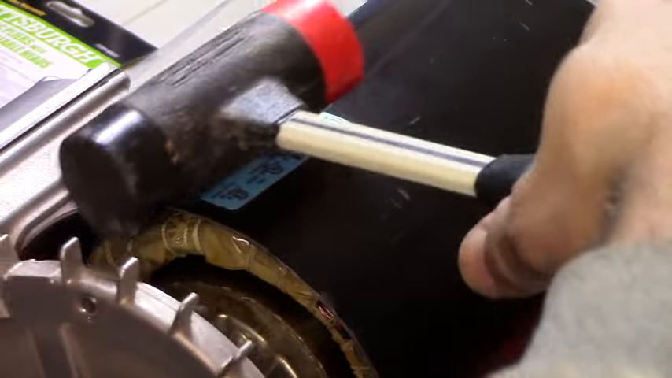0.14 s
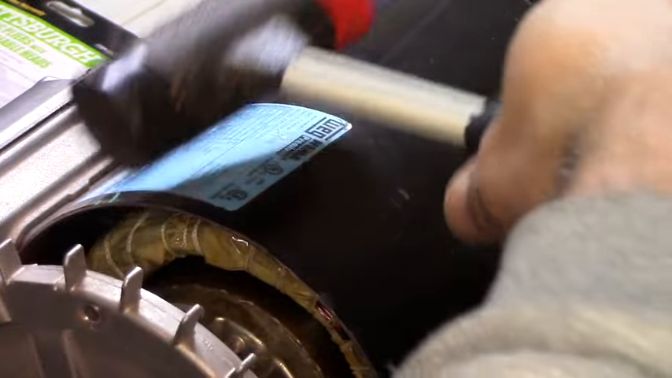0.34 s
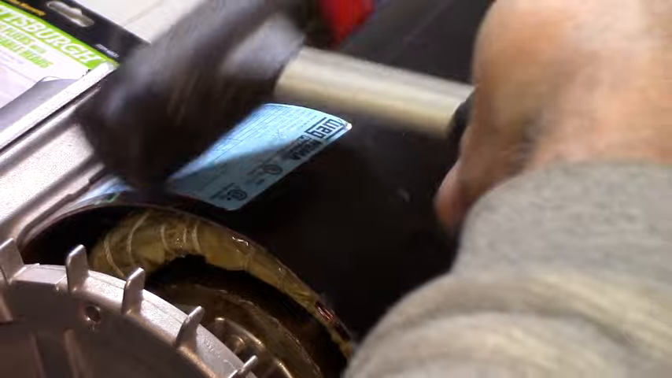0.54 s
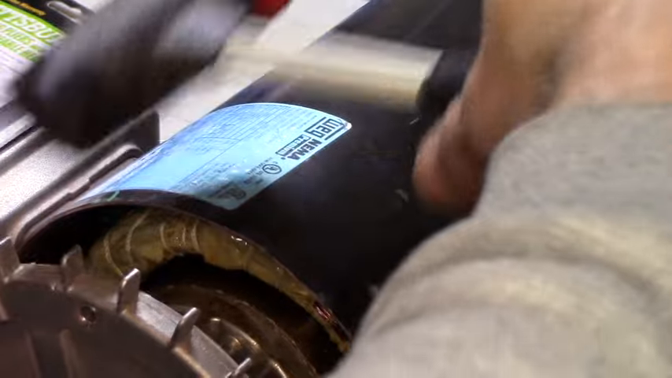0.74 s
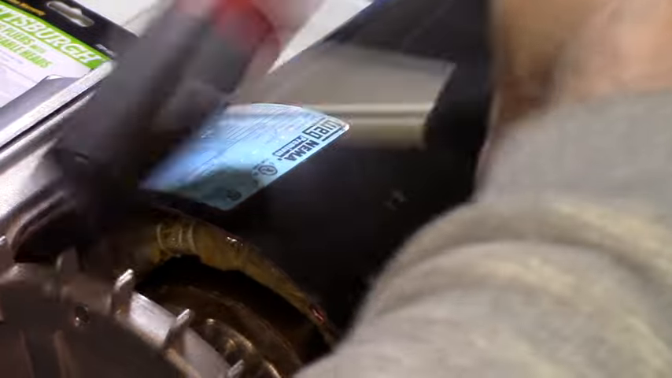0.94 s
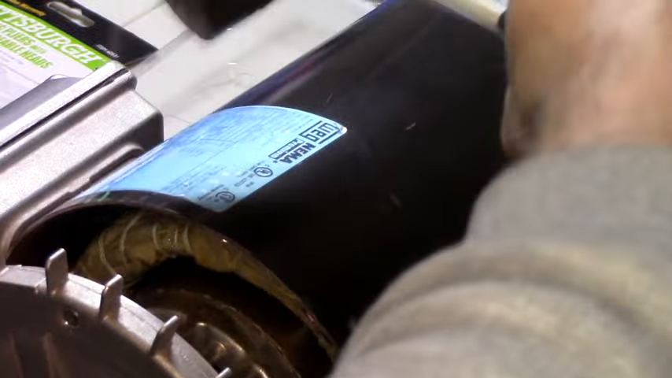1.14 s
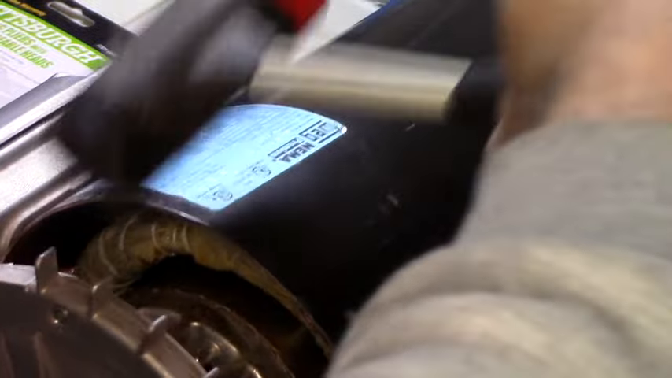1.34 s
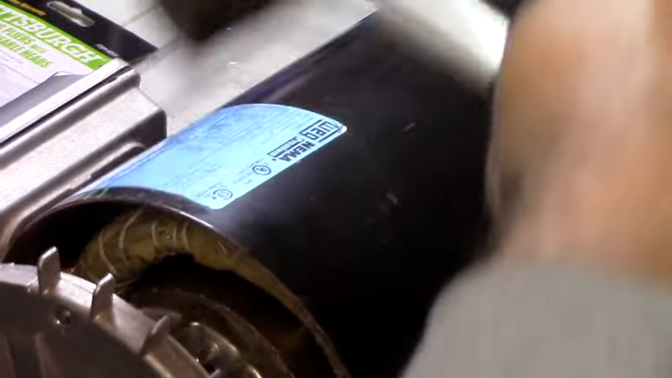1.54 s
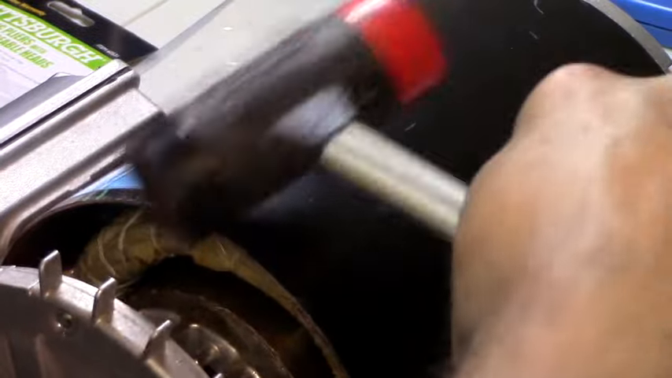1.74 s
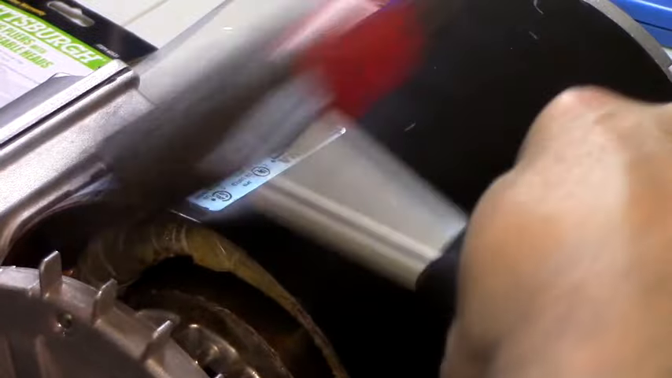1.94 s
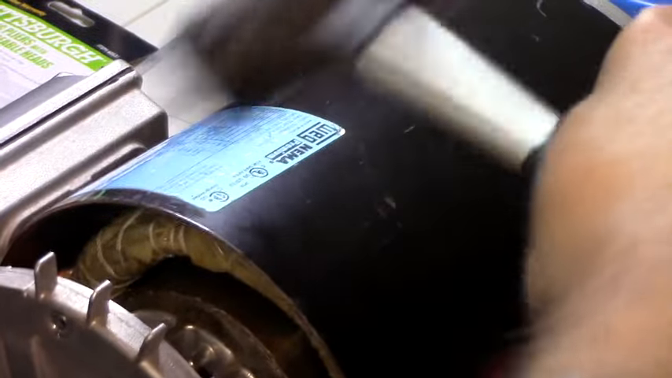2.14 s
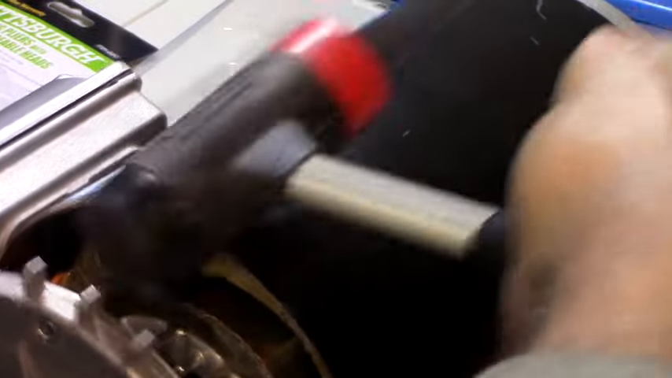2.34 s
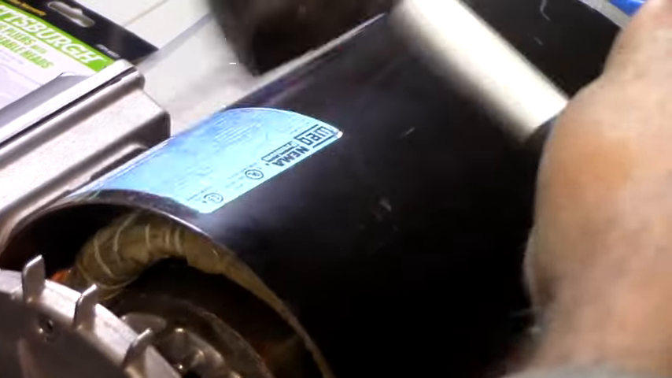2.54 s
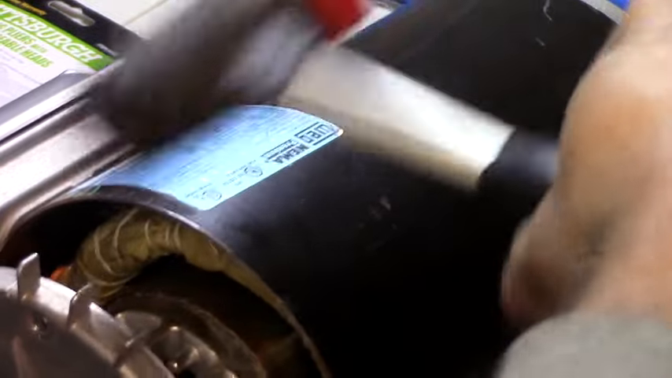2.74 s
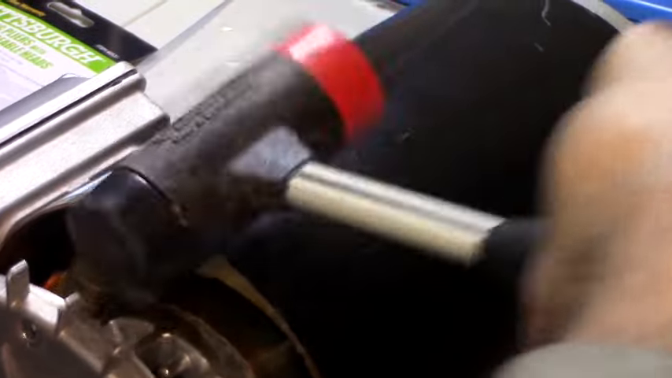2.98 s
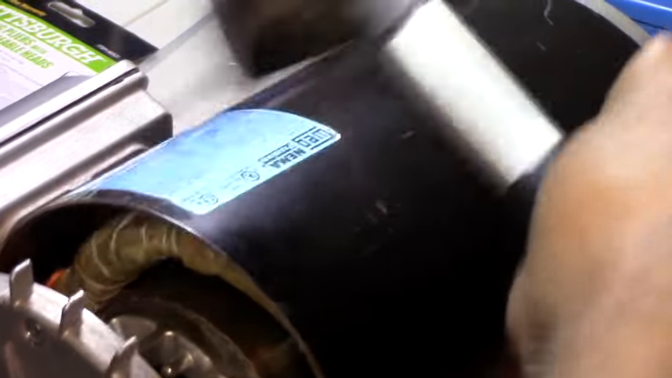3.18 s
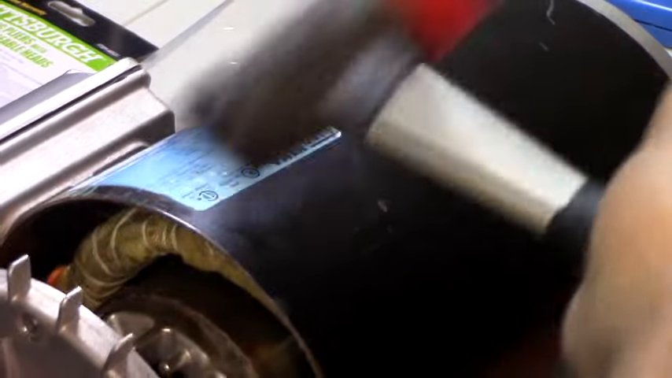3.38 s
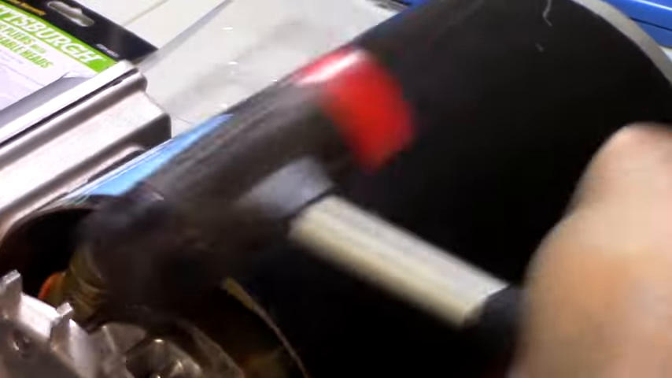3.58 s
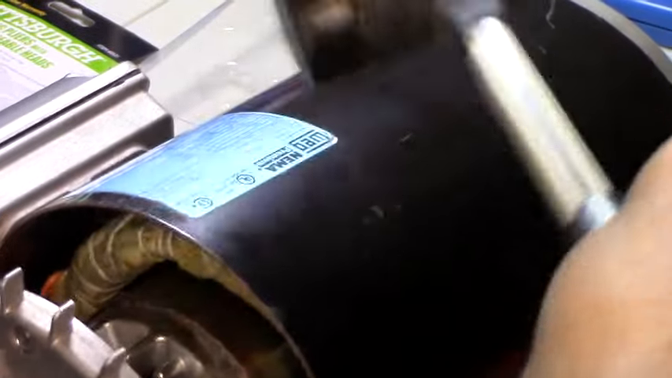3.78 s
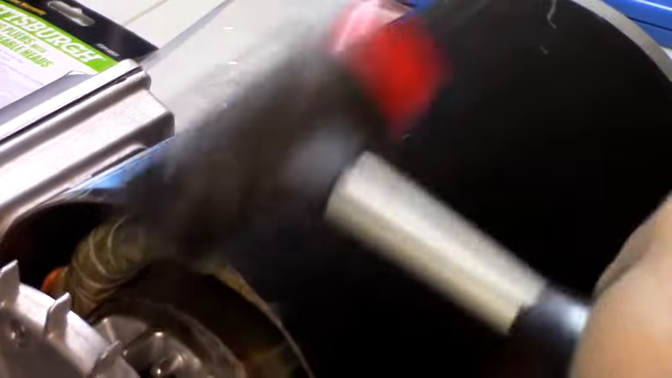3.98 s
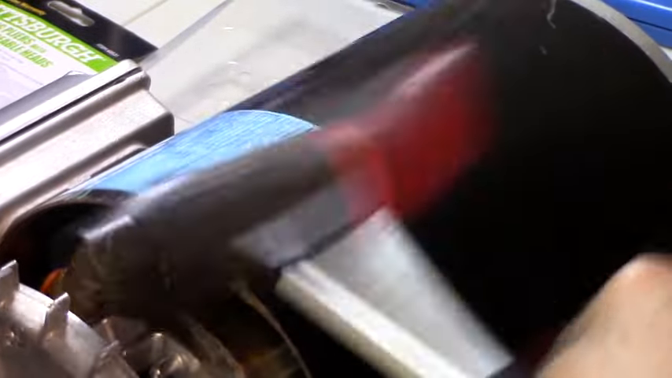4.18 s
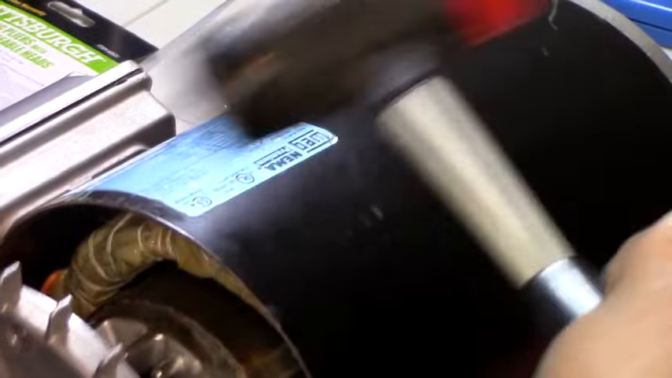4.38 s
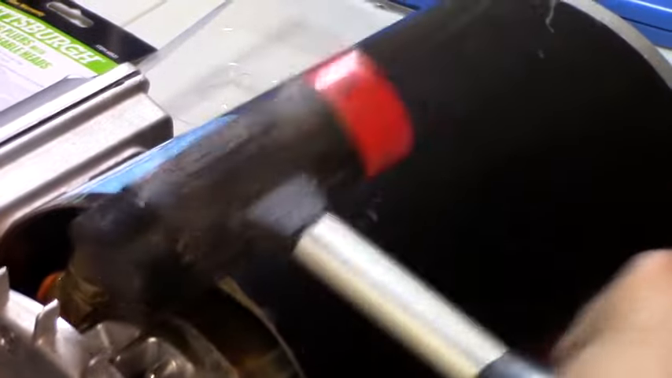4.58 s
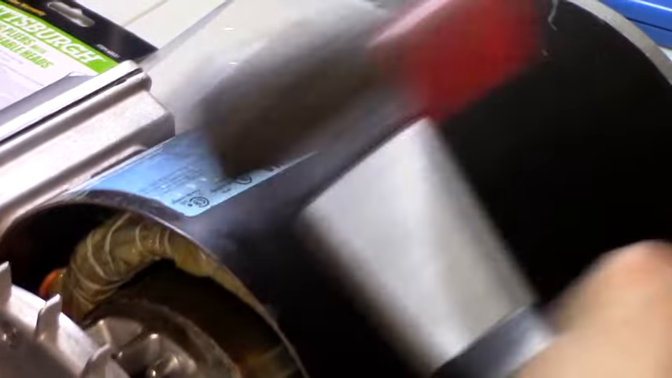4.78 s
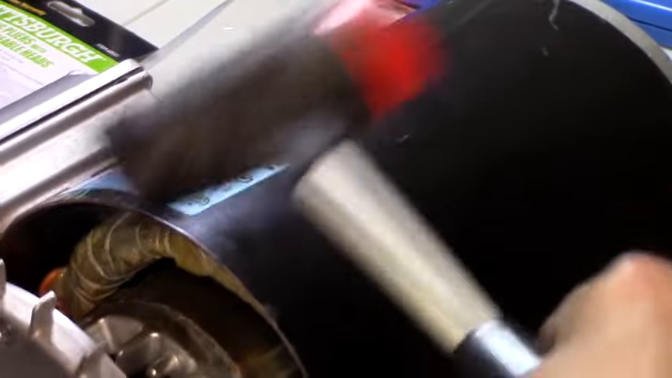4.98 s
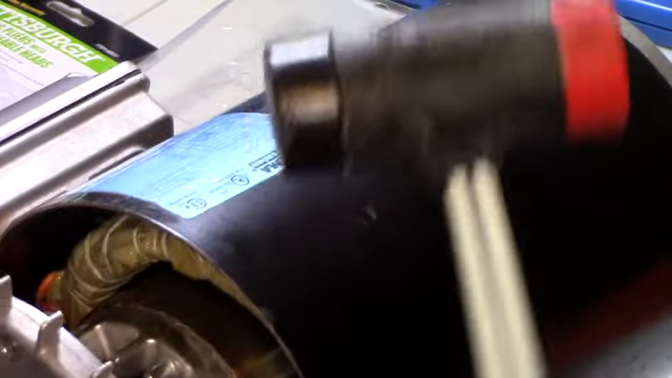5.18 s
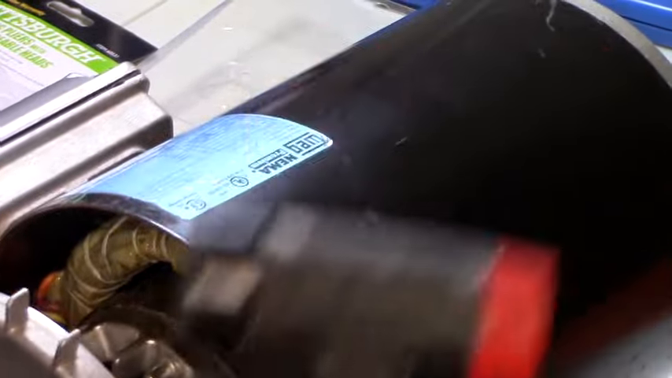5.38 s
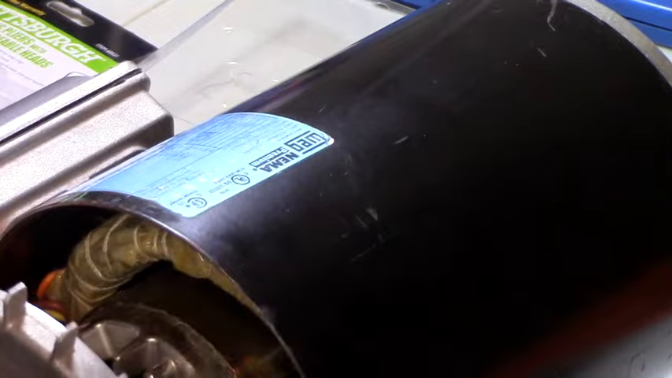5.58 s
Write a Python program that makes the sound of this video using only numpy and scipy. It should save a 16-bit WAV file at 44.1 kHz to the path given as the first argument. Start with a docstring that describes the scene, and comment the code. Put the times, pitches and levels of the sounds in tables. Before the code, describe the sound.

A soft-faced mallet knocks steadily on a hollow steel motor shell, dull clangs with a bright zing, the loose motor clacking on the bench.

```python
"""A soft-faced mallet knocks on the steel shell of an electric motor in a small workshop, about three times a second.
Each blow excites a dense field of decaying modes, a dull clang with a bright zing, and the bench answers with a thud.
After the earlier blows above all, the loose motor rocks on the bench: repeated landings, each a clack and a low boom.
Before the blows come drags (rough resonant noise), touches (short bands of noise) and a clunk (a few damped sines);
a few more touches and a drag fall between the blows. Beneath lie a rustle, a faint late echo and a steady hiss."""
import sys
import numpy as np
from scipy import signal
from scipy.fft import rfft, irfft, next_fast_len
from scipy.io import wavfile
from scipy.ndimage import uniform_filter1d

SR = 44100
rng = np.random.default_rng(int(sys.argv[2]) if len(sys.argv) > 2 else 0)


def wav_record(signal):
    """Record a signal, one row per channel, as 16-bit PCM in the file named by sys.argv[1]."""
    frames = np.transpose(np.atleast_2d(signal))
    bounded = np.clip(frames, -1, 1)
    # unit amplitude maps onto the largest positive 16-bit level
    quanta = np.round(bounded * 32767).astype(np.int16)
    wavfile.write(sys.argv[1], SR, quanta)


N = 247828
AGE = np.arange(int(.8 * SR)) / SR  # time since the start of one sound (s)


def undb(db):
    """Logarithmic level: decibels to amplitude gain."""
    return 10 ** (np.asarray(db) / 20)


def along(points, hz):
    """Log-frequency interpolation between (frequency [Hz], value) points."""
    at, value = np.transpose(points)
    return np.interp(np.log(hz + 1), np.log(at), value)


def colour(x, db_at):
    """Minimum-phase filtering by a gain in dB over frequency: causal, so attacks stay sharp."""
    size = 2 * next_fast_len(len(x))
    hz = np.arange(size // 2 + 1) * SR / size
    cepstrum = irfft(np.log(undb(db_at(hz))))
    # folding the cepstrum onto positive time gives the minimum phase
    cepstrum[1:size // 2] *= 2
    cepstrum[size // 2 + 1:] = 0
    response = np.exp(rfft(cepstrum))
    return irfft(rfft(x, size) * response)[:len(x)]


def noise(db_at, size=len(AGE)):
    """Spectral shaping of random noise, scaled to unit rms."""
    x = colour(rng.standard_normal(size), db_at)
    return x / x.std()


def fade(t60):
    """Exponential decay: a free vibration loses 60 dB in t60 seconds."""
    return undb(-60 * AGE / t60)


def hump(hz, centre_hz, width_hz):
    """Resonance curve: a bell of height 1 around the centre frequency."""
    return 1 / (1 + (2 * (hz - centre_hz) / width_hz) ** 2)


def resonance(centre_hz, width_hz):
    """Resonant band of noise: unit rms, steep sides and no deep bass."""
    def db_at(hz):
        bass_cut = (hz + 1) / np.hypot(hz, centre_hz / 3)
        return 40 * np.log10(hump(hz, centre_hz, width_hz)) + 20 * np.log10(bass_cut)
    return noise(db_at)


def ring(modes):
    """Modal superposition: modes (frequency [Hz], level [dB], t60 [s]), each a decaying sine."""
    return sum(undb(db) * fade(t60) * np.sin(2 * np.pi * hz * AGE) for hz, db, t60 in modes)


def waver(size, per_s):
    """Random modulation: a curve of spread near 1 through per_s new values a second."""
    return np.interp(np.arange(size) / SR * per_s, np.arange(512), rng.standard_normal(512))


def patches(depth_db, step_hz):
    """Dependence on the point of excitation: each spot favours its own modes, a random dB ripple."""
    knots = np.arange(0, SR / 2, step_hz)
    ripple = depth_db * rng.standard_normal(512)[:len(knots)].clip(-1.5, 1.5)
    return lambda hz: np.interp(hz, knots, ripple)


def add(out, s, x):
    """Linear superposition: mix x into out from time s on."""
    start = int(s * SR)
    out[start:start + len(x)] += x[:len(out) - start]


# Spectrum of the stir of hand and sleeve: (frequency [Hz], level [dB])
RUSTLE_SPECTRUM = [(25, -30.5), (70, -19.5), (140, -3.5), (400, -9), (900, -18.5), (1800, -16.5),
                   (5200, -22.5), (8000, -24), (15000, -43.5)]
# its level (dB), when the arm comes to rest (s), how fast it then dies (dB per s)
STIR_DB, REST_S, SETTLE_DB_PER_S = -68.5, 4.94, 36.5


def stir(waver_db=4.0, wavers_per_s=26):
    """Friction noise: the working arm rustles unevenly and settles when the mallet is put down."""
    settle_db = SETTLE_DB_PER_S * np.maximum(np.arange(N) / SR - REST_S, 0)
    level = undb(STIR_DB - settle_db + waver_db * waver(N, wavers_per_s))
    return level * noise(lambda hz: along(RUSTLE_SPECTRUM, hz), size=N)


# The head is dragged over the shell:
# (time [s], length [s], rub level [dB], squeak frequency [Hz], squeak level [dB])
DRAGS = [(0.09, .035, -86, 5450, -66.5), (.226, .045, -74, 5920, -59), (.562, .04, -44.5, 2625, -38),
         (1.781, .1, -52.5, 6045, -66)]
# Resonances that the drag excites: (frequency [Hz], width [Hz], level relative to the rub [dB])
DRAG_RESONANCES = [(882.6, 370, 1.5), (1950, 1000, -9.5), (3550, 570, -7), (4250, 280, -13),
                   (5230, 900, -19), (6120, 610, -16)]


def drags(attack_s=0.027, release_s=0.028, squeak_width_hz=700, rough_db=2.0, slips_per_s=70):
    """Stick-slip friction: the head catches and slips, so each resonance flares unevenly; a squeak stands out."""
    out = np.zeros(N)
    for s, length, rub_db, squeak_hz, squeak_db in DRAGS:
        peaks = [(hz, width, rub_db + db) for hz, width, db in DRAG_RESONANCES]
        peaks.append((squeak_hz, squeak_width_hz, squeak_db))
        rub = sum(resonance(hz, width) * undb(db + rough_db * waver(len(AGE), slips_per_s))
                  for hz, width, db in peaks)
        onset = 1 - np.exp(-AGE / attack_s)
        release = np.exp(-np.maximum(AGE - length, 0) / release_s)
        add(out, s, rub * onset * release)
    return out


def workshop(direct, late_db=-37, late_t60_s=1.0):
    """Late reverberation: convolution with decaying noise gives a faint, dull echo of the room."""
    # (frequency [Hz], level [dB])
    room = [(50, 13.5), (170, 15.5), (900, -3.5), (5000, -14.5), (12000, -22.5)]
    tail = noise(lambda hz: along(room, hz)) * fade(late_t60_s)
    tail = tail / np.linalg.norm(tail)
    return undb(late_db) * signal.fftconvolve(direct, tail)[:N]


# Light touches of the mallet head: (time [s], knock frequency [Hz], knock level [dB],
# tick frequency [Hz], tick level [dB], scuff level [dB], rise time [s])
TOUCHES = [(0.263, 375, -32.5, 5100, -67, -66, 0.0011), (.384, 500, -43.5, 2080, -48.5, -43, 0.0039),
           (.478, 600, -40.5, 2000, -50, -42, 0.0033), (.548, 540, -33.5, 2560, -35, -47, 0.0026),
           (1.6528, 590, -35.5, 2570, -34.5, -43, .0006), (1.755, 562, -35, 3280, -47.5, -65.5, 0.005),
           (2.474, 487, -53, 5480, -50, -48, 0.0042), (4.158, 700, -45.5, 2540, -37, -46.5, 0.0066)]
# Spectrum of a scuff, also of the crack in the clunk: (frequency [Hz], level [dB])
SCUFF_SPECTRUM = [(200, -30), (1200, -5.5), (3000, -3.5), (5800, 2), (8000, -12), (11000, -19),
                  (15000, -36)]


def touches(knock_t60_s=0.23, tick_t60_s=0.24, scuff_t60_s=0.19, knock_width_hz=680, tick_width_hz=800):
    """Weak contact excitation: the head brushes and nudges the shell; a knock, a pitched tick and a scuff."""
    out = np.zeros(N)
    for s, knock_hz, knock_db, tick_hz, tick_db, scuff_db, rise_s in TOUCHES:
        spot = patches(4, 350)
        knock = undb(knock_db) * resonance(knock_hz, knock_width_hz) * fade(knock_t60_s)
        tick = undb(tick_db) * resonance(tick_hz, tick_width_hz) * fade(tick_t60_s)
        scuff = noise(lambda hz: along(SCUFF_SPECTRUM, hz) + spot(hz)) * fade(scuff_t60_s)
        # a sliding touch builds up more slowly than a tap
        onset = 1 - np.exp(-AGE / rise_s)
        add(out, s, (knock + tick + undb(scuff_db) * scuff) * onset)
    return out


CLUNK_S = .6076  # time of the clunk (s)
# Modes of the hollow clunk: (frequency [Hz], level [dB], t60 [s])
CLUNK_MODES = [(440, -22, 0.22), (559, -3, 0.023), (681.5, 3.5, 0.029), (841, -13.5, 0.079),
               (745, -18.5, 0.052), (1736, -22, .06), (2910, 5.5, 0.0043), (4620, -31.5, 0.099)]
# Chattering contacts of the clunk: (delay [s], level [dB])
CLUNK_CONTACTS = [(0, 3.5), (.0059, -7), (0.0096, -18), (.029, -9), (0.064, -16.5)]
# Spectrum of the room's answer to the clunk: (frequency [Hz], level [dB])
CLUNK_TAIL = [(60, -43.5), (150, -6.5), (300, -14), (480, -8), (700, -2.5), (1100, -14.5), (1800, -18.5),
              (3600, -38), (4900, -26.5), (7000, -39), (10000, -52), (15000, -58.5)]


def clunk(level_db=0, contact_s=0.0016, low_hz=330, crack_db=-27, crack_t60_s=0.02, tail_db=-19, tail_t60_s=0.29):
    """Repeated impact: a soft face chatters on the hollow shell, and the room answers."""
    out = np.zeros(N)
    # the finite contact of the soft face rounds the attack
    knock = ring(CLUNK_MODES) * (1 - np.exp(-(AGE / contact_s) ** 2))
    # the open shell radiates little bass
    knock = signal.sosfilt(signal.butter(2, low_hz, "high", fs=SR, output="sos"), knock)
    for delay, db in CLUNK_CONTACTS:
        add(out, CLUNK_S + delay, undb(level_db + db) * knock)
    crack = noise(lambda hz: along(SCUFF_SPECTRUM, hz)) * fade(crack_t60_s)
    tail = noise(lambda hz: along(CLUNK_TAIL, hz)) * fade(tail_t60_s)
    add(out, CLUNK_S, undb(crack_db) * crack)
    add(out, CLUNK_S, undb(tail_db) * tail * (1 - np.exp(-AGE / .004)))
    return out


# Dense ringing of shell and room after a blow: (frequency [Hz], level [dB])
SHELL_SPECTRUM = [(40, -41.5), (80, -23), (140, -30.5), (250, -10), (470, -9), (690, 2.5), (1100, -3),
                  (2200, -6), (3500, -10.5), (4100, -12.5), (5600, -9.5), (7000, -26.5), (9500, -39),
                  (12500, -40), (15500, -56)]
# Humps where many modes crowd together: (frequency [Hz], width [Hz], gain [dB])
MODE_CLUSTERS = [(700, 150, 4), (950, 100, 5), (1280, 70, 4), (1630, 130, 4), (2220, 100, 3),
                 (2850, 160, 6), (3480, 300, 6), (4590, 320, 8), (5280, 440, 9), (6570, 220, 6),
                 (7480, 200, 6)]


def shell_db(hz):
    """Modal density: the spectrum of the shell rises where its modes cluster."""
    clusters = sum(db * hump(hz, centre, width) for centre, width, db in MODE_CLUSTERS)
    return along(SHELL_SPECTRUM, hz) + clusters


# How long the dense ringing lasts: (frequency [Hz], t60 [s])
RING_T60 = [(100, .58), (300, .44), (700, .33), (2000, .3), (5000, .255), (9000, .21), (14000, .17)]


def dense_ring(db_at):
    """Statistical modal overlap: countless modes of metal and room as noise; the low ones last longest."""
    spectrum = rfft(noise(db_at))
    hz = np.arange(len(spectrum)) * SR / len(AGE)
    at, t60s = np.transpose(RING_T60)
    # overlapping bands that sum to one, each with its own decay
    shares = [along(np.c_[at, one], hz) for one in np.eye(len(at))]
    return sum(irfft(spectrum * share, len(AGE)) * fade(t60) for share, t60 in zip(shares, t60s))


# share of the gap left each time, thump and clack lost by the second landing (dB)
ROCK_SHRINK, THUMP_LOSS_DB, CLACK_LOSS_DB = 0.66, 4, 5.5


def landings(s, db, gap_s, count=3):
    """Energy loss at each landing: ever quicker and weaker rows (time [s], thump [dB], clack [dB])."""
    k = np.arange(count)
    gaps = gap_s * ROCK_SHRINK ** k
    spent = k ** 1.19
    times = s + np.cumsum(gaps) - gaps
    return np.c_[times, db - THUMP_LOSS_DB * spent, db - CLACK_LOSS_DB * spent]


# Mallet blows: (time [s], level [dB], brightness of the spot struck [0-1], level of the rocking
# it causes [dB], time until the motor first lands [s], gap to its next landing [s])
BLOWS = [(0.9345, 0.8, 0, -2, .144, .066), (1.2264, 0, 0.26, -5.5, .15, 0.069),
         (1.9396, -1.44, .03, 1.5, .147, 0.074), (2.289, 2, 0.37, -4, .15, 0.074),
         (2.6057, 0.5, 0.67, -7, 0.14, .083), (2.908, -0.1, 0.72, -22, .228, 0.1),
         (3.2224, 0, 0.74, -37.5, .222, 0.077), (3.5331, -1.85, 0.74, -28.5, 0.23, 0.083),
         (3.8451, -4.5, 0.76, -29, .226, 0.052), (4.168, -5.5, 0.77, -27, 0.22, 0.086),
         (4.4948, -5, 0.95, -24, 0.23, 0.061), (4.7971, -6, 1, -33, 0.24, 0.055)]
# Spectrum of the clack of a landing: (frequency [Hz], level [dB])
CLACK_SPECTRUM = [(60, -11.5), (150, -5), (260, 1), (420, 2.5), (600, -7), (810, 7.5), (1030, -3.5),
                  (1450, -25), (2200, -14), (3200, -35.5), (6000, -29.5), (12000, -58)]
# rocking after the clunk: level (dB), time until the motor first lands (s), gap to its next landing (s)
CLUNK_ROCK_DB, CLUNK_LANDS_S, CLUNK_GAP_S = -4, .134, 0.069


def rocking(thump_db=-33.0, thump_hz=162, build_s=0.022, clack_db=-32.0, clack_t60_s=0.22, ring_db=-50):
    """Impact of a rocking body: the motor lands with a clack that faintly rings the shell; the bench top booms."""
    out = np.zeros(N)
    swell = (AGE / build_s * np.exp(1 - AGE / build_s)) ** 4
    bouts = [landings(CLUNK_S + CLUNK_LANDS_S, CLUNK_ROCK_DB, CLUNK_GAP_S)]
    bouts += [landings(s + lands_s, db, gap_s) for s, _, _, db, lands_s, gap_s in BLOWS]
    shell = undb(ring_db) * dense_ring(shell_db)
    for s, thump, clack in np.vstack(bouts):
        # each landing booms within 5 % of the nominal pitch
        boom_hz = thump_hz * rng.uniform(.95, 1.05)
        boom = swell * np.sin(2 * np.pi * boom_hz * AGE)
        metal = undb(clack_db) * noise(lambda hz: along(CLACK_SPECTRUM, hz)) * fade(clack_t60_s) + shell
        onset = 1 - np.exp(-AGE / 0.0037)
        add(out, s, undb(thump_db + thump) * boom + undb(clack) * metal * onset)
    return out


# Modes of the shell that stand out: (frequency [Hz], level [dB])
SHELL_MODES = [(151, -22), (255, -20.5), (437, -20.5), (578, -14), (639, -9), (703, -7), (766, -8),
               (902, -14.5), (932, -15.5), (977, -16), (1272, -14.5), (1604, -17.5), (2359, -21.5),
               (2871, -20), (3560, -23), (4412, -20.5), (4501, -16), (4640, -14), (4713, -17.5),
               (5174, -18.5), (5310, -21)]
# A bright spot trades thud for zing:
# (frequency [Hz], gain on the dullest spot [dB], gain added on the brightest [dB])
SPOT_COLOUR = [(350, 2, -7.5), (600, -2, -2.5), (980, -4, -4), (1310, -3, -1), (2170, 1, -4.5),
               (2860, -5, 1.5), (3500, -3, 5.5), (4100, -7.5, 7.5), (4400, -5.5, 10.5), (4640, -2, 9),
               (5156, -12, 19.5), (5560, -17.5, 22.5), (6560, -1.5, 9.5)]


def blows(level_db=-14, modes_db=-2.5, rise_s=0.028, start_db=-17.5, crest_db=1.5, crest_s=0.038,
          attack_s=0.0044, clatter_db=0.85, clatters_per_s=140):
    """Modal excitation: every blow rings the same shell and room; the spot struck shifts the colour."""
    out = np.zeros(N)
    same = dense_ring(shell_db)
    # the clang starts subdued, swells to a short crest and then dies freely
    swell_db = start_db * np.clip(1 - AGE / rise_s, 0, 1) ** 0.83
    swell_db += crest_db * np.exp(-abs(AGE - rise_s) / crest_s)
    swell = undb(swell_db) * (1 - np.exp(-AGE / attack_s))
    for s, db, brightness, *_ in BLOWS:
        # mostly the shared ringing, partly new with each blow
        dense = .8 * same + .6 * dense_ring(shell_db)
        # single modes are hit harder or softer and die a little before the room does
        luck_db = rng.uniform(-3, 3, len(SHELL_MODES))
        tones = ring([(hz, own_db + luck, .88 * along(RING_T60, hz))
                      for (hz, own_db), luck in zip(SHELL_MODES, luck_db)])
        zones = [(hz, dull + brightness * gained) for hz, dull, gained in SPOT_COLOUR]
        spot = patches(1.8, 110)
        sound = colour(dense + undb(modes_db) * tones, lambda hz: along(zones, hz) + spot(hz))
        # loose parts chatter, so the clang flutters
        flutter_db = clatter_db * waver(len(AGE), clatters_per_s)
        add(out, s, undb(level_db + db + flutter_db) * swell * sound)
    return out


def bench(level_db=-45, bright_db=-6, centre_hz=190, width_hz=280, peak_s=0.055):
    """Structure-borne response: the bench answers each blow with a late low thud, most under a dull spot."""
    out = np.zeros(N)
    swell = (AGE / peak_s * np.exp(1 - AGE / peak_s)) ** 4
    for s, db, brightness, *_ in BLOWS:
        level = undb(level_db + db + bright_db * brightness)
        add(out, s, level * swell * resonance(centre_hz, width_hz))
    return out


def scene():
    """Superposition of all the knocks, their room and the rustle, in one channel."""
    direct = blows() + bench() + rocking() + touches() + drags() + clunk()
    return (direct + workshop(direct) + stir())[None]


def suppress(x, threshold_db=-84, depth_db=-9, spare_hz=900):
    """Downward expansion: treble bands that sink under a threshold are turned down; bright tails shorten."""
    hz, _, bands = signal.stft(x, fs=SR, nperseg=256)
    # power smoothed over neighbouring bands, then over time
    power = uniform_filter1d(abs(bands) ** 2, size=3, axis=-2)
    power = uniform_filter1d(power, size=5, axis=-1).clip(0)
    quiet = 1 / (1 + power / undb(threshold_db) ** 2)
    treble = (hz ** 2 / (hz ** 2 + spare_hz ** 2))[:, None]
    return signal.istft(bands * undb(depth_db * quiet * treble))[1][:, :N]


# Spectrum of the steady self-noise of the recorder: (frequency [Hz], level [dB])
HISS_SPECTRUM = [(25, -14), (120, 0), (400, -5), (1500, -14), (5500, -17), (9000, -29), (15000, -38)]
TOP_HZ = 15500  # upper band limit


def record(dry, bass_hz=52, hiss_db=-85):
    """Band limiting and soft saturation: peaks are rounded, deep bass, faint treble and the top reduced."""
    bass_cut = signal.butter(3, bass_hz, "high", fs=SR, output="sos")
    top_cut = signal.ellip(8, .2, 80, TOP_HZ, fs=SR, output="sos")
    sound = suppress(signal.sosfilt(bass_cut, np.tanh(dry)))
    hiss = undb(hiss_db) * noise(lambda hz: along(HISS_SPECTRUM, hz), size=N)
    return signal.sosfilt(top_cut, sound + hiss)


dry = scene()
out = record(dry)
wav_record(out)
```